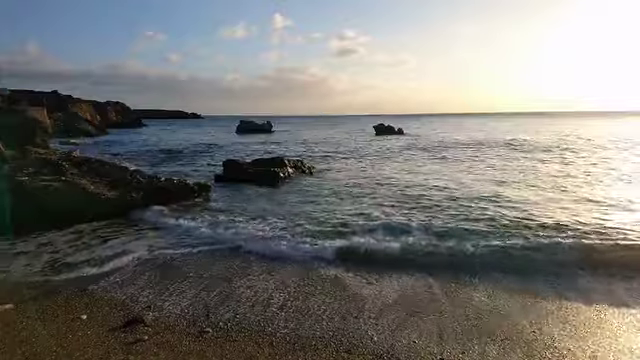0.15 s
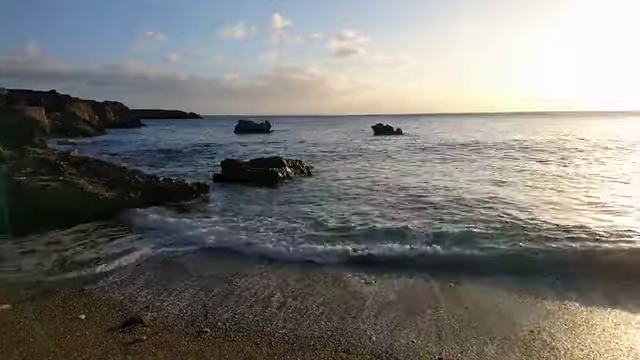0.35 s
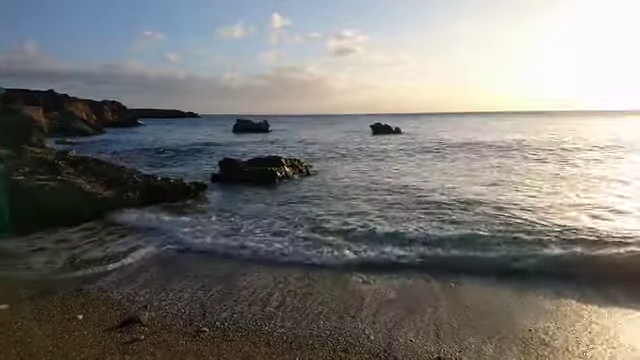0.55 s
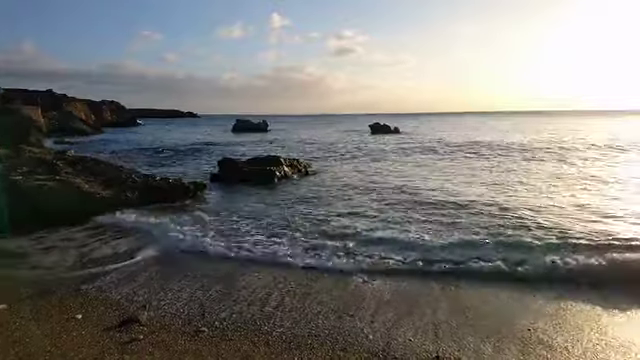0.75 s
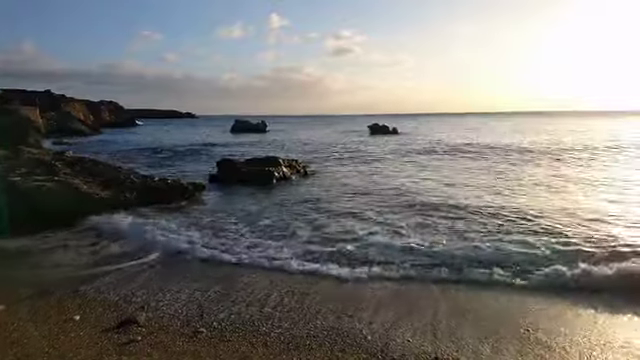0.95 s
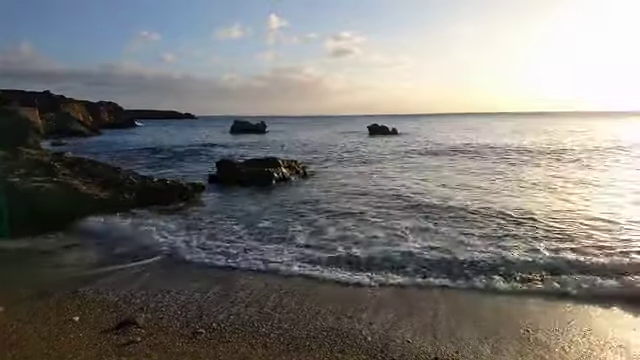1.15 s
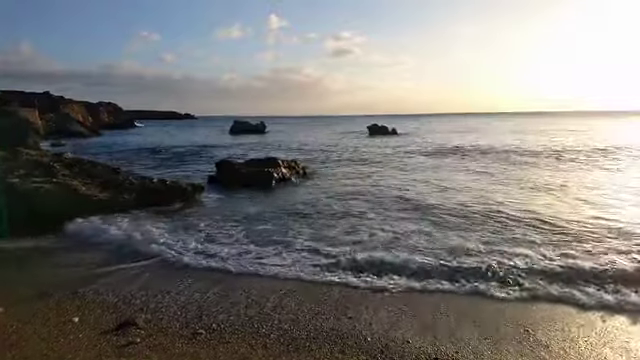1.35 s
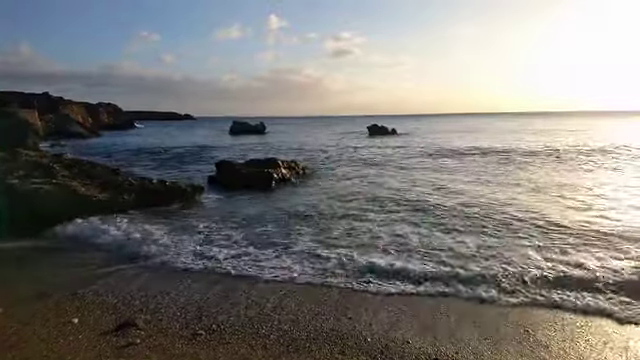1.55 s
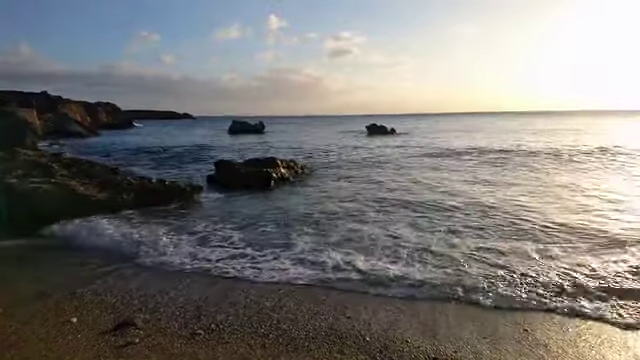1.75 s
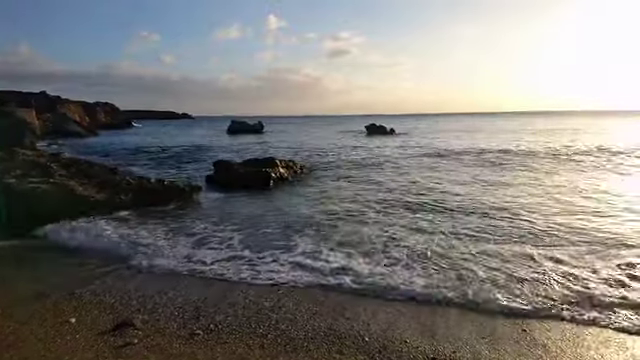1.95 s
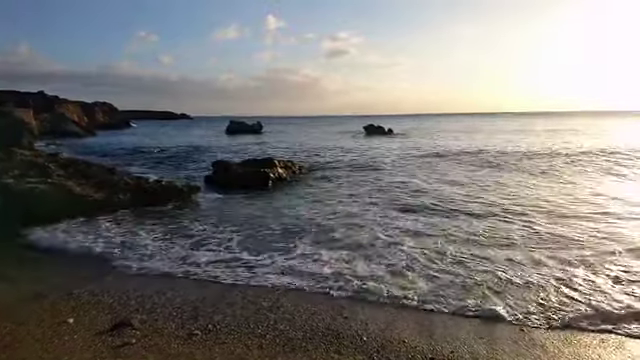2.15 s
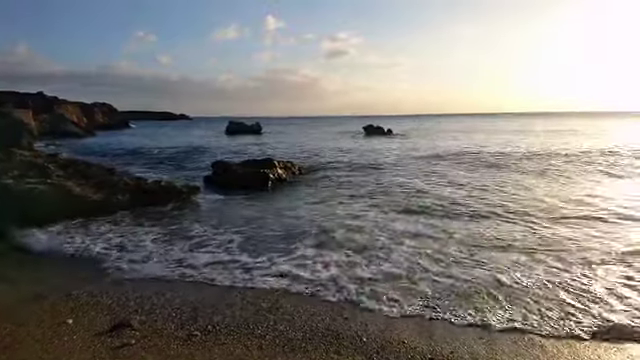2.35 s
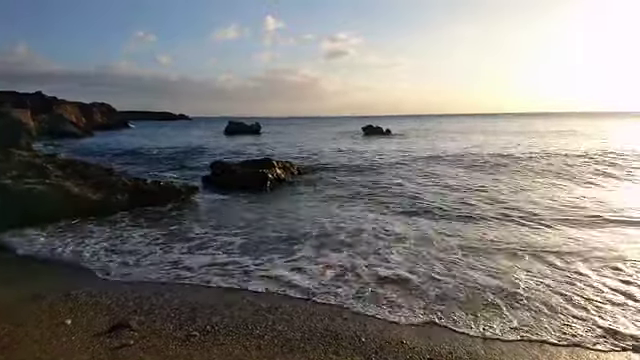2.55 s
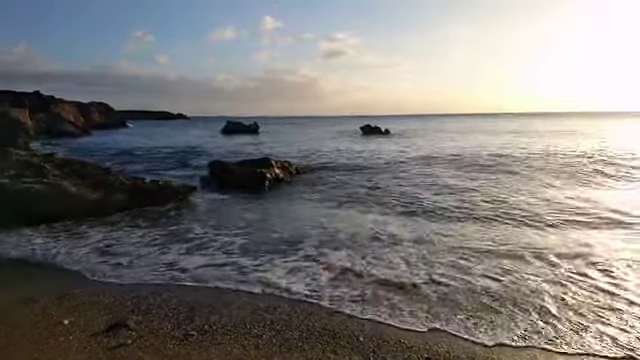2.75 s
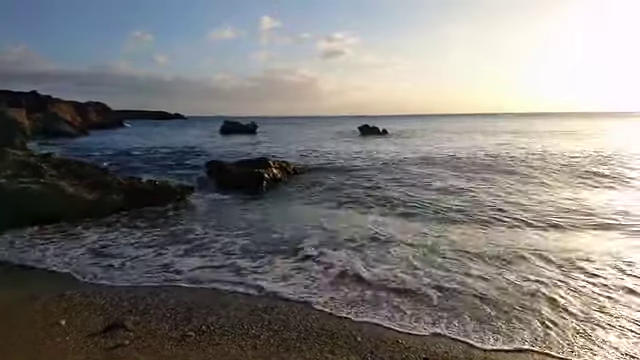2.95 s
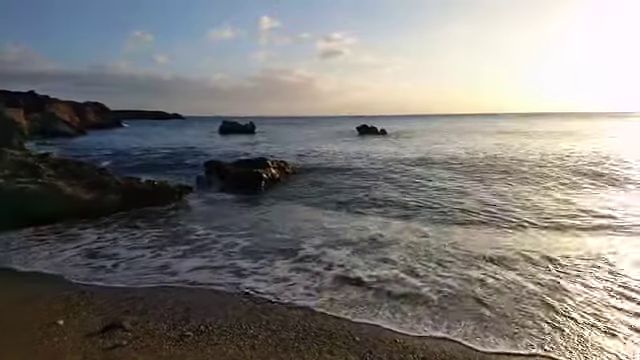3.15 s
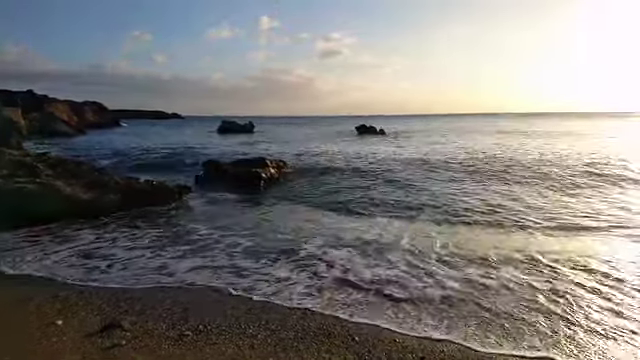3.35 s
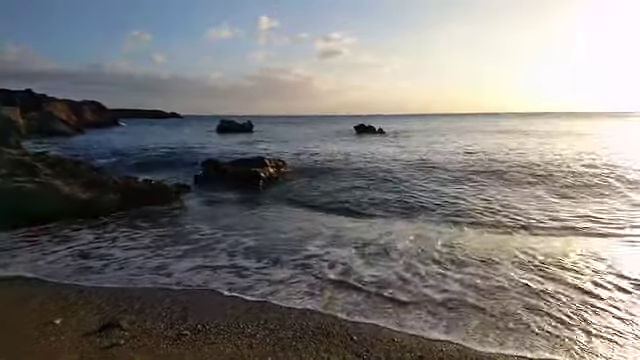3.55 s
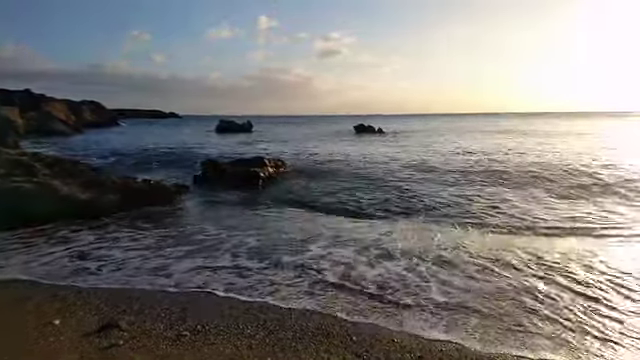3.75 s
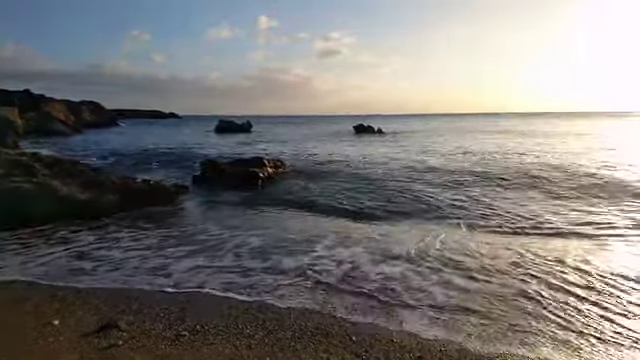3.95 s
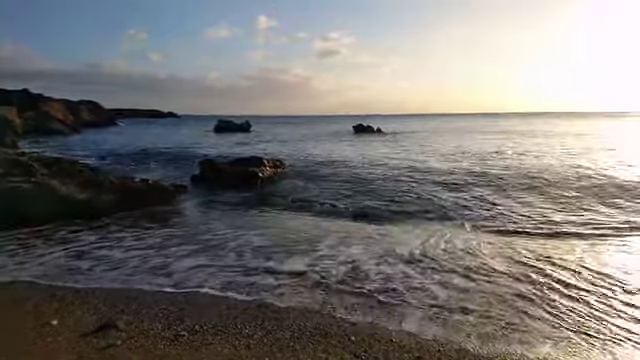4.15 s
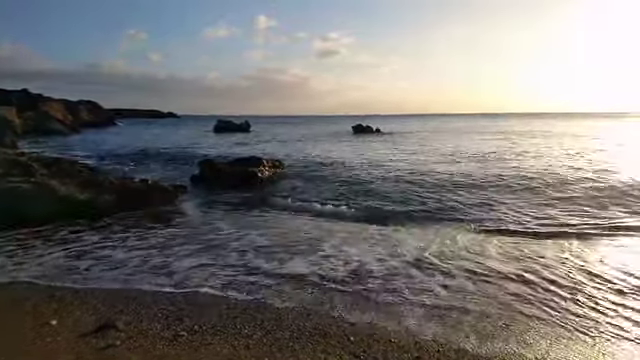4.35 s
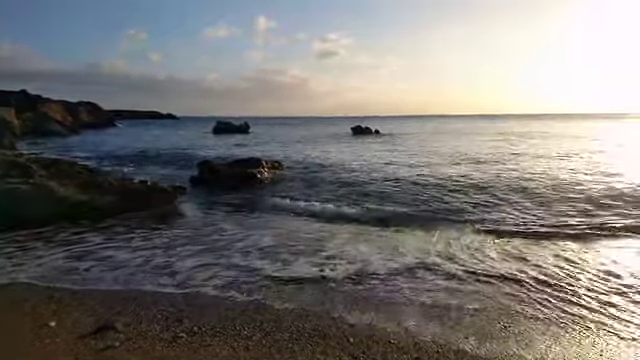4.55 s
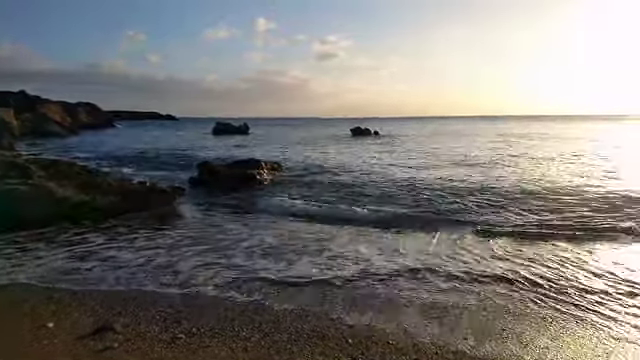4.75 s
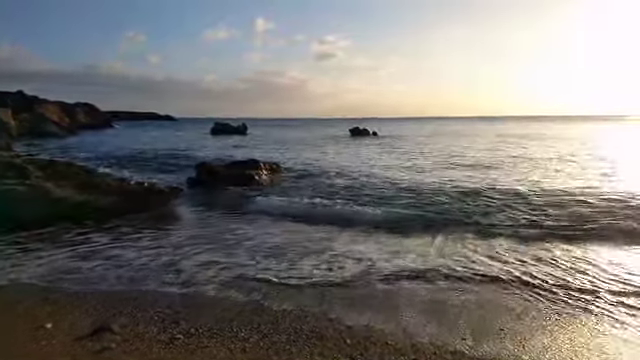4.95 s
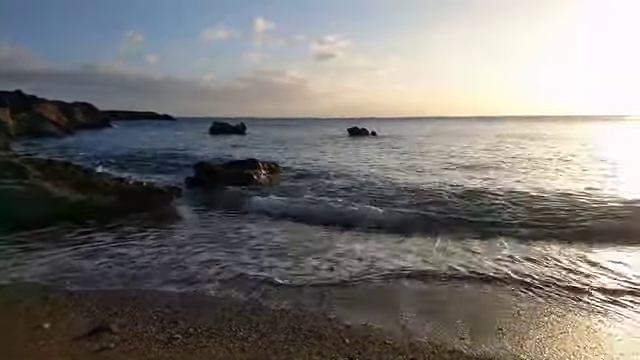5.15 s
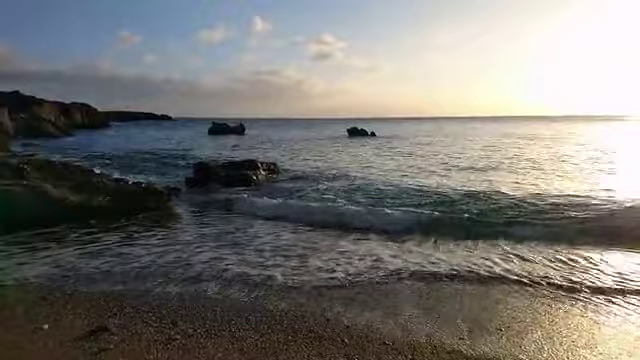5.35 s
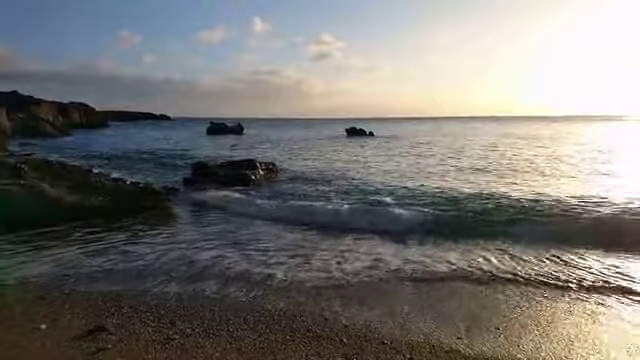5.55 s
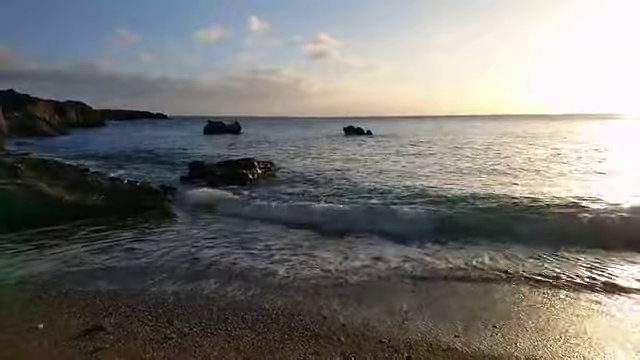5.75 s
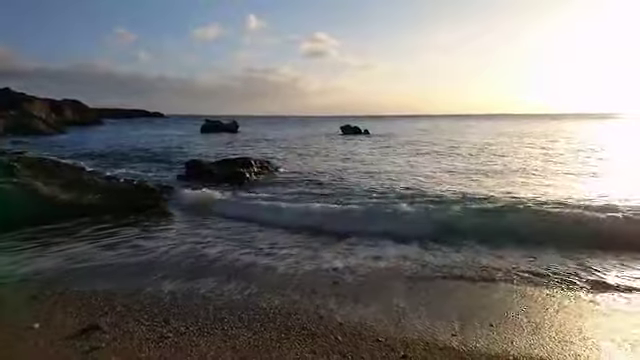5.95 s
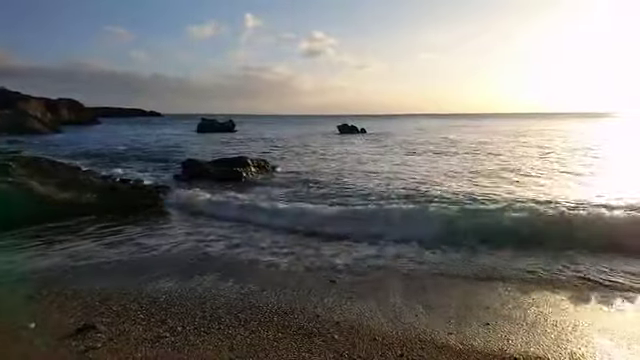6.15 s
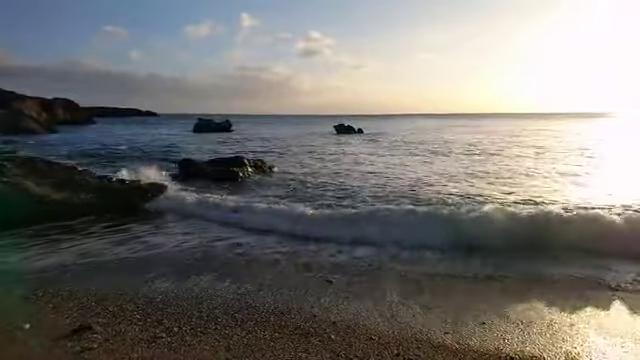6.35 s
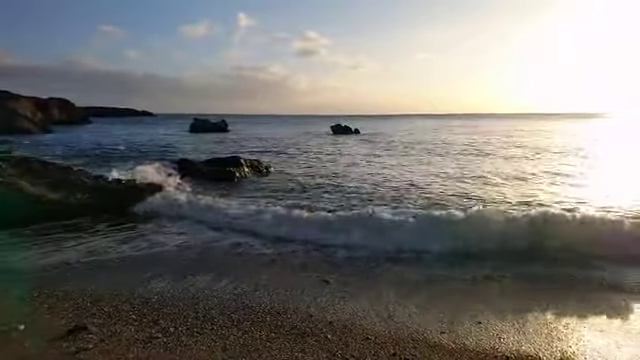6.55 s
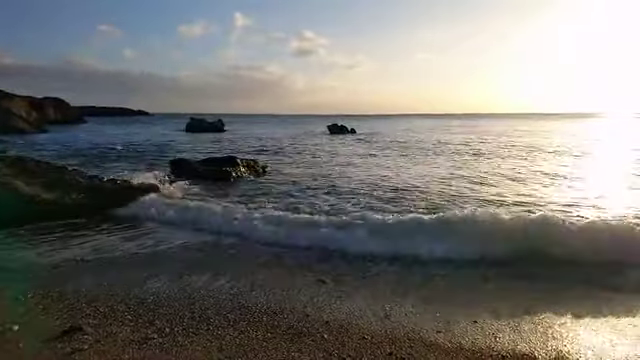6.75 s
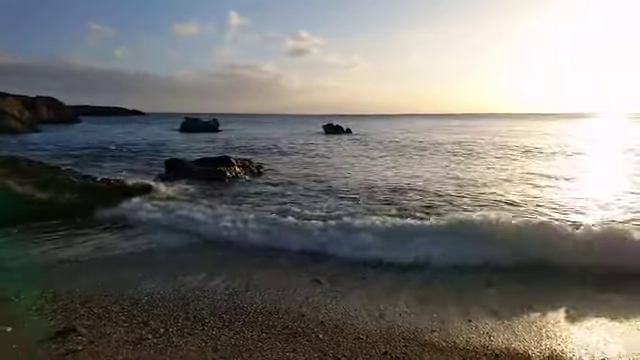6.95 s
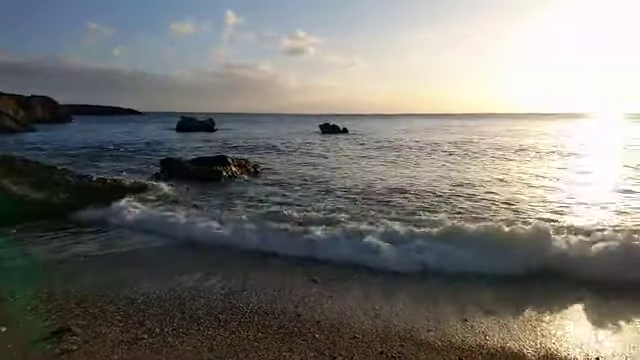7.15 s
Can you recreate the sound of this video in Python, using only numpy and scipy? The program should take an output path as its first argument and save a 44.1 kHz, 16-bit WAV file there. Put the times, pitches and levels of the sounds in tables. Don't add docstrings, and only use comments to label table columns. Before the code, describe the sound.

After a brief silence at the start, a small wave tumbles up the sand with a soft rushing hiss. Its foam fizzes and drains back, quieter, then a new wave breaks with low thuds and splashy spray and swells into the loudest full wash at the end. Two tiny bird chips sound far off. Open beach, close stereo microphones low over the sand.

```python
import sys
import numpy as np
from scipy import signal
from scipy.fft import rfft, irfft, next_fast_len
from scipy.io import wavfile
from scipy.ndimage import uniform_filter1d

SR = 44100
rng = np.random.default_rng(int(sys.argv[2]) if len(sys.argv) > 2 else 0)


def rack_gain(trim_db):
    fader = np.asarray(trim_db, float)
    return 10 ** (fader / 20)


def store_pcm(level_fs):
    pcm = np.round(np.clip(level_fs, -1, 1) * 32767).astype(np.int16)
    wavfile.write(sys.argv[1], SR, np.atleast_2d(pcm).T)


N = 317961

# (time [s], foam vigour [dB], weight of tumbling water over foam [dB])
SURF = [(.58, -51, 5), (.66, -45, 2.5), (.78, -40, 4.5), (1.35, -39, 4.5), (1.95, -45, 4.5),
        (2.6, -46.5, 4.5), (2.95, -47, 5), (3.55, -49, 3), (4.07, -51, 7.5), (4.25, -45.5, -1),
        (4.5, -42.5, 0.5), (4.85, -40.5, 6), (5.35, -37.5, 4), (6.15, -34.5, 7), (6.4, -34, 8.5),
        (7.2, -33.5, 9.5)]
# (low edge [Hz], high edge [Hz])
BUBBLE_BANDS_HZ = [(40, 130), (130, 400), (400, 1100), (1100, 4000), (4000, 15800)]
SIZE_DB = (-13.5, -5, -1, -0.2, -6)
WEIGHT_SHARE = (1.41, 1.22, 0.41, -0.13, 0.25)
# (time [s], thud [dB], spray [dB])
PLUNGES = [(1.3, 2, -0.5), (2.5, 2.5, -0.5), (3.72, 1, .1), (4.0, 4, 1.2), (4.17, 4, 5.5), (4.59, 6.5, 0),
           (4.85, 0.5, -1), (5.02, 4, -0.5), (5.7, 1.5, -1.5), (6.36, 0, -1.5), (6.76, 3, -2.5),
           (7.0, -1.5, 1)]
THUD_SHARE = (1.4, 0.78, 0, 0.12, 0.14)
SPRAY_SHARE = (0.36, 0.11, 0, .3, 1.0)
# (frequency [Hz], level [dB per Hz])
UPRUSH_COLOUR = [(30, -32), (60, -13), (120, -5), (300, 2.5), (800, -8), (1200, -11.5), (2500, -14),
                 (4500, -18), (6500, -19), (10000, -26), (15700, -26.5)]
BACKWASH_COLOUR = [(30, -29), (60, 0), (120, -4.5), (300, 0.5), (800, -5.5), (1200, -6.5), (2500, -11),
                   (4500, -15.5), (6500, -17.5), (10000, -23), (15700, -22.5)]
BREAKER_COLOUR = [(30, -37), (60, -13), (120, -7.5), (300, -2), (800, -7.5), (1200, -9.5), (2500, -12),
                  (4500, -15.5), (6500, -15.5), (10000, -22.5), (15700, -25)]
# (from [s], to [s], left lag [ms], lag spread [ms], split to both ends [ms],
# left sand echo [ms], right sand echo [ms], echo spread [ms], left echo [dB], right echo [dB])
UPRUSH_PLACE = (.3, 1.75, .3, .13, 0, 1.42, 1.58, .07, -13, -7)
BACKWASH_PLACE = (1.75, 4.15, .04, .06, .4, 1.35, 1.45, .12, -12, -5)
BREAKER_PLACE = (4.15, 7.6, .09, .16, 0, 1.6, 1.62, .06, -8.5, -7.5)
# (uprush [dB], backwash [dB], breaker [dB])
PAN_DB = (0.2, 0.7, -.3)
# (uprush [dB], backwash [dB], breaker [dB])
SHADE_DB = (-3.5, -5, -1.5)
# (time [s], length [s], start pitch [Hz], end pitch [Hz], peak [dB])
CHIPS = [
    (1.180, .026, 6800, 5700, -43.5),
    (3.107, .033, 6550, 5200, -46),
]
# (left delay [s], right delay [s])
SAND_ECHO_S = (.0032, .0027)
# (frequency [Hz], gain [dB])
LEFT_PORT = [(60, -9.5), (200, -6), (380, -6), (700, -4.5), (2400, -6), (4200, -5), (5200, -5),
             (6700, -4.5), (7400, -6.5), (8100, -7), (10000, -6), (10800, -8), (12000, -12.5), (13500, -10),
             (15600, -15)]
RIGHT_PORT = [(60, -2.5), (330, -1), (410, -4.5), (520, 0.5), (3400, -0.5), (4000, 1), (4600, -1.5),
              (5300, -2), (6700, -1.5), (7400, -5), (8100, -6), (9000, -2), (12000, -2.5), (15600, -2)]
# (frequency [Hz], margin [dB])
MASK_MARGIN = [(6500, -40), (7300, -5), (10000, -4.5), (10800, -2), (13000, -2.2), (15500, -.5)]

HANDOVER_S = 0.35


def at_hz(points, hz):
    table_hz, table_db = np.transpose(points)
    return np.interp(np.log(hz), np.log(table_hz), table_db)


def bird():
    out = np.zeros((2, N))
    for start_s, length_s, start_hz, end_hz, peak_db in CHIPS:
        x = np.arange(int(length_s * SR)) / (length_s * SR)
        pitch_hz = start_hz + (end_hz - start_hz) * x ** 1.3
        envelope = np.minimum(8 * x, 1) * np.sqrt(1 - x)
        chip = envelope * np.sin(2 * np.pi * np.cumsum(pitch_hz) / SR)
        for side, echo_s in enumerate(SAND_ECHO_S):
            for delay_s, gain_db in ((0, 0), (echo_s, -2.5)):
                at = int((start_s + delay_s) * SR)
                out[side, at:at + len(x)] += rack_gain(peak_db + gain_db) * chip
    return out


def drift(rate_hz, size):
    step, settle = 40, 2000
    pole = np.exp(-2 * np.pi * step * rate_hz / SR)
    noise = rng.standard_normal(size // step + settle + 2)
    slow = signal.lfilter([1], [1, -2 * pole, pole * pole], noise)[settle:]
    return np.interp(np.arange(size) / step, np.arange(len(slow)), slow / slow.std())


def bursts(size, per_s, spread_db):
    born = rng.random(size) < per_s / SR
    strength = rack_gain(spread_db * np.minimum(rng.exponential(1, size), 5))
    clicks = born * strength * rng.choice([-1, 1], size)
    return clicks / clicks.std()


def paths(place, hz, count):
    lag_ms, lag_spread_ms, split_ms, left_ms, right_ms, echo_spread_ms, left_db, right_db = place[2:]
    sand_lead_rad, sand_rough_hz = 1.1, 5500
    along = (np.arange(count) + rng.random(count)) / count * np.sqrt(12) - np.sqrt(3)
    lags_ms = lag_ms + lag_spread_ms * along + split_ms * (-1) ** np.arange(count)
    turn = -2j * np.pi * hz / 1000
    ports = rack_gain([at_hz(LEFT_PORT, hz), at_hz(RIGHT_PORT, hz)])
    sand = np.exp(1j * sand_lead_rad) / (1 + (hz / sand_rough_hz) ** 2)
    for late_ms, offset in zip(lags_ms, rng.permutation(along)):
        direct = np.exp(np.outer([late_ms / 2, -late_ms / 2], turn))
        echo = [rack_gain(db) * np.exp(turn * (ms + echo_spread_ms * offset))
                for ms, db in ((left_ms, left_db), (right_ms, right_db))]
        yield ports * direct * (1 + sand * echo)


def surf_db(t):
    attack_s, release_s = 0.066, 0.064
    far_swell_db = -50.5
    time_s, vigour_db, weight_db = np.transpose(SURF)
    plunge_s, thud_db, spray_db = np.transpose(PLUNGES)
    since_peak = t - plunge_s[:, None] - attack_s
    shape = np.clip(1 + since_peak / attack_s, 0, 1) * np.exp(-np.maximum(since_peak, 0) / release_s)
    levels = np.interp(t, time_s, vigour_db) + np.c_[list(SIZE_DB)]
    levels = levels + np.outer(WEIGHT_SHARE, np.interp(t, time_s, weight_db))
    levels = levels + np.outer(THUD_SHARE, thud_db @ shape)
    levels = levels + np.outer(SPRAY_SHARE, spray_db @ shape)
    levels[0] = 10 * np.log10(rack_gain(2 * levels[0]) + rack_gain(2 * far_swell_db))
    return levels


def water(colour, place, shade_db, per_s, spread_db, patchy_db):
    shade_hz, shade_width_hz = 13600, 900
    first = int((place[0] - HANDOVER_S) * SR)
    size = next_fast_len(3 * SR + SR + SR // 2)
    t = (first + np.arange(size)) / SR
    hz = np.maximum(np.arange(size // 2 + 1) * SR / size, 1)

    heard = np.zeros((2, 2, len(hz)), complex)
    for path in paths(place, hz, count=10):
        for k in range(2):
            heard[k] += path * rfft(bursts(size, per_s, spread_db))
    heard *= rack_gain(at_hz(colour, hz)) * (hz > 20)
    heard[:, 1] *= rack_gain(shade_db * np.exp(-((hz - shade_hz) / shade_width_hz) ** 2))

    power = 2 * np.mean(np.abs(heard.mean(axis=1)) ** 2, axis=0) / size ** 2
    swell_db = [db - 10 * np.log10(power[(hz > lo) & (hz < hi)].sum())
                for db, (lo, hi) in zip(surf_db(t), BUBBLE_BANDS_HZ)]
    size_octave = np.log2([np.sqrt(lo * hi) for lo, hi in BUBBLE_BANDS_HZ])

    out, together, octave = 0, drift(5.9, size), np.log2(hz)
    for k, centre in enumerate(np.arange(5, 14.6, .5)):
        skirt = np.cos(np.pi * np.clip(octave - centre, -.5, .5))
        position = np.interp(centre, size_octave, range(5))
        share = np.clip(1 - np.abs(position - np.arange(5)), 0, 1)
        flicker = 0.46 * together + 0.51 * drift(6.1, size) + 0.5 * drift(20, size)
        gain = rack_gain(share @ swell_db + patchy_db * flicker)
        out = out + gain * irfft(heard[k % 2] * skirt, size)

    rise, fall = (np.clip((t - edge_s) / HANDOVER_S, -1, 1) for edge_s in place[:2])
    out = out * np.sin(np.pi / 4 * (1 + rise)) * np.cos(np.pi / 4 * (1 + fall))
    full = np.zeros((2, N + 2 * size))
    full[:, size + first:2 * size + first] = out
    return full[:, size:size + N]


def breaker():
    peel_db, peel_s = 3, 1.8
    body = water(BREAKER_COLOUR, BREAKER_PLACE, SHADE_DB[2], per_s=3000, spread_db=2.5, patchy_db=1.06)
    since_s = np.maximum(np.arange(N) / SR - BREAKER_PLACE[0], 0)
    lean_db = peel_db * np.exp(-since_s / peel_s)
    return body * rack_gain([lean_db / 2, -lean_db / 2])


def scene():
    uprush = water(UPRUSH_COLOUR, UPRUSH_PLACE, SHADE_DB[0], per_s=2500, spread_db=2.5, patchy_db=1.0)
    backwash = water(BACKWASH_COLOUR, BACKWASH_PLACE, SHADE_DB[1], per_s=1500, spread_db=3.0, patchy_db=0.55)
    bodies = (uprush, backwash, breaker())
    return bird() + sum(rack_gain([[db], [0]]) * body for db, body in zip(PAN_DB, bodies))


def thin_treble(x, margin, reach_hz, lead):
    frame = dict(window="cosine", nperseg=2048, noverlap=1024)
    hz, _, lines = signal.stft(np.pad(x, ((0, 0), (lead, 0))), SR, **frame)
    power = np.abs(lines) ** 2
    reach = int(reach_hz / hz[1])
    mask = uniform_filter1d(power, size=reach, axis=1)
    mask = uniform_filter1d(np.minimum(power, 5 * mask), size=reach, axis=1)
    group = uniform_filter1d(power, size=11, axis=1)
    kept = group > mask * rack_gain(2 * at_hz(margin, hz + 1))[:, None]
    return signal.istft(lines * kept, SR, **frame)[1][:, lead:lead + N]


def top_cut(x):
    return signal.sosfilt(signal.butter(12, 15880, fs=SR, output="sos"), x)


def record(dry):
    start_s, top_hz = 0.5692, 15760
    cut = signal.sosfilt(signal.butter(4, 45, "high", fs=SR, output="sos"), dry)
    cut = thin_treble(cut, MASK_MARGIN, reach_hz=5500, lead=882)
    cut = signal.sosfilt(signal.ellip(12, .5, 60, top_hz, fs=SR, output="sos"), cut)
    mix = cut * (np.arange(N) > start_s * SR)
    return top_cut(mix)


dry = scene()
out = record(dry)
store_pcm(out)
```